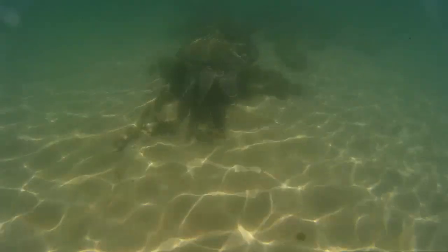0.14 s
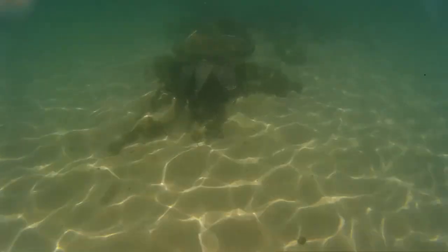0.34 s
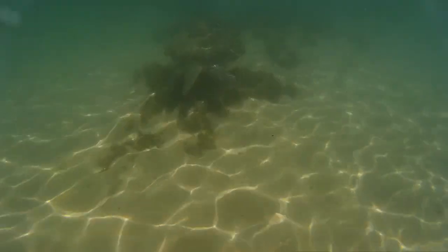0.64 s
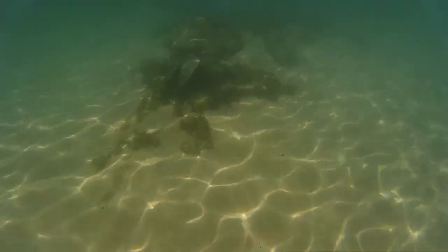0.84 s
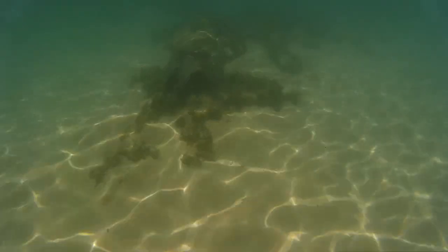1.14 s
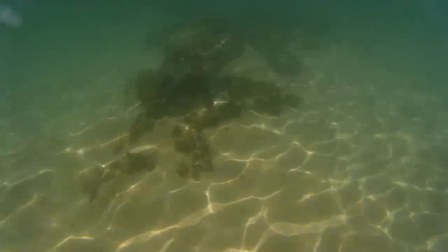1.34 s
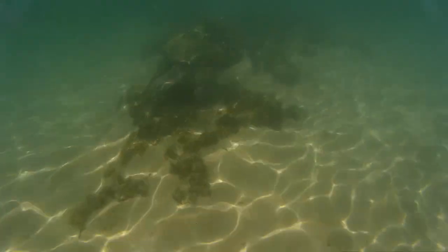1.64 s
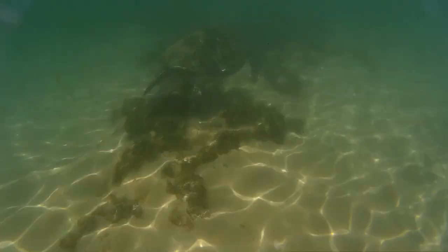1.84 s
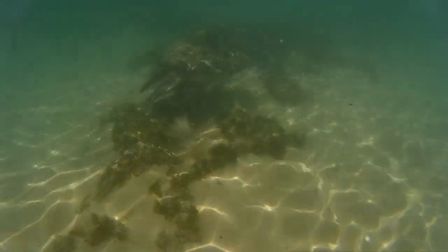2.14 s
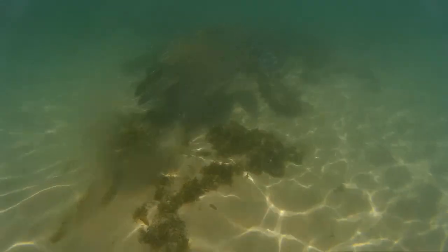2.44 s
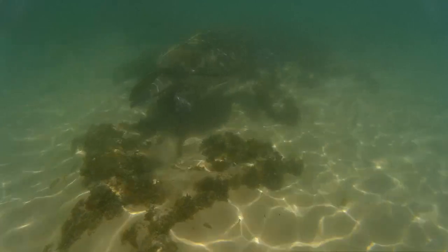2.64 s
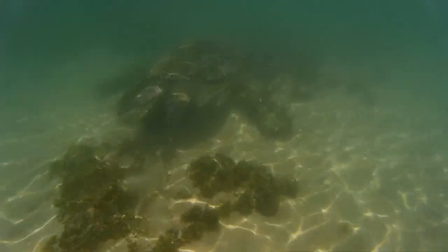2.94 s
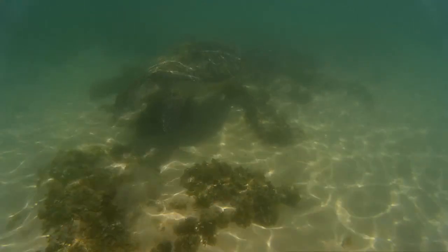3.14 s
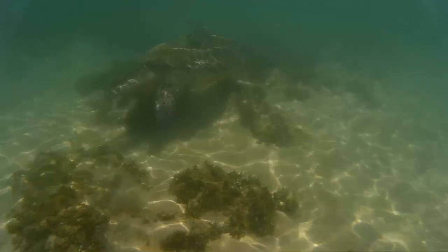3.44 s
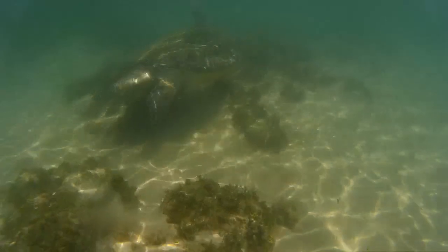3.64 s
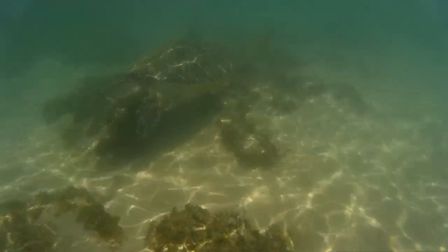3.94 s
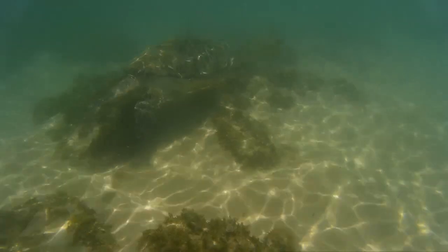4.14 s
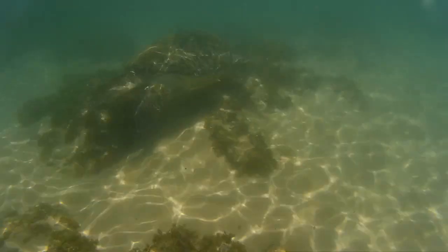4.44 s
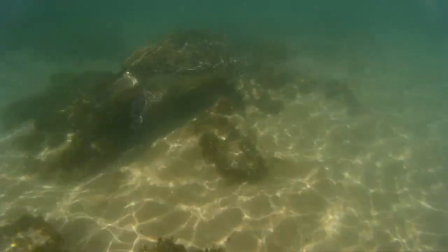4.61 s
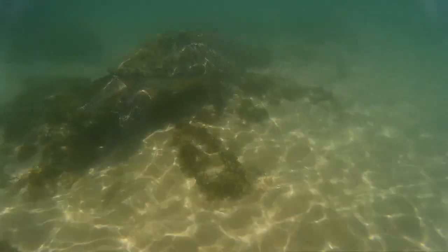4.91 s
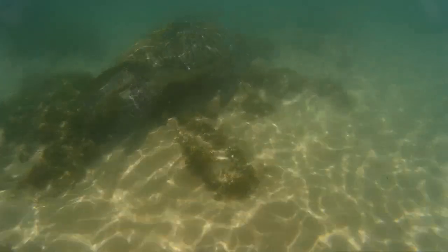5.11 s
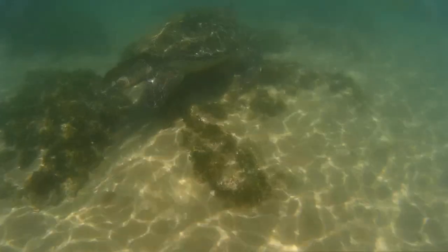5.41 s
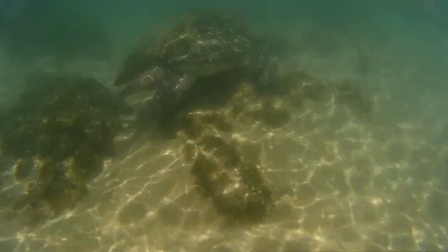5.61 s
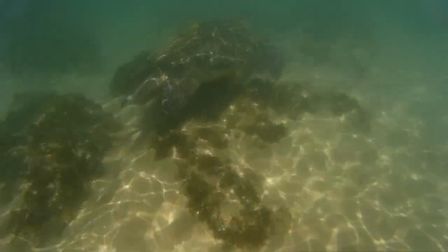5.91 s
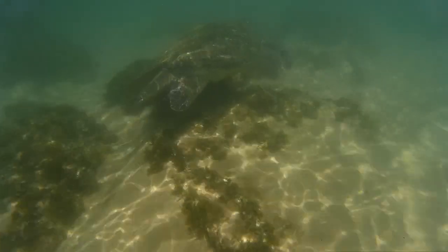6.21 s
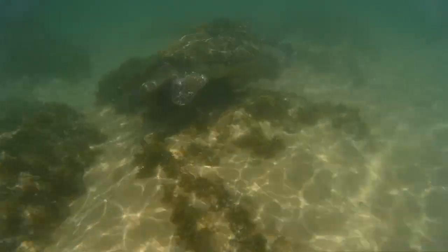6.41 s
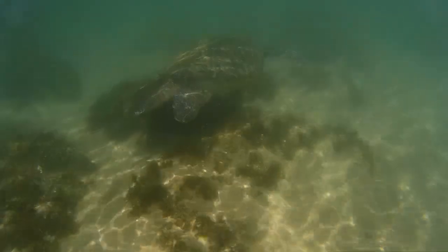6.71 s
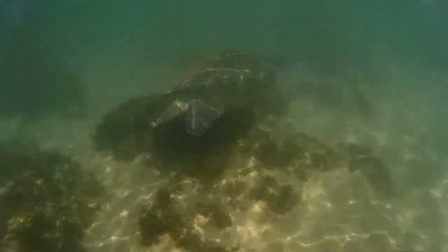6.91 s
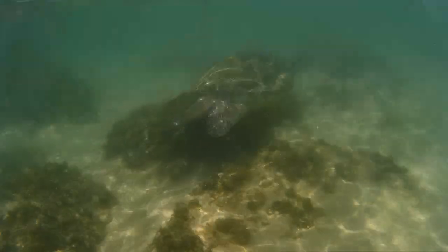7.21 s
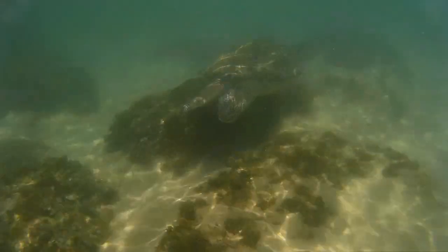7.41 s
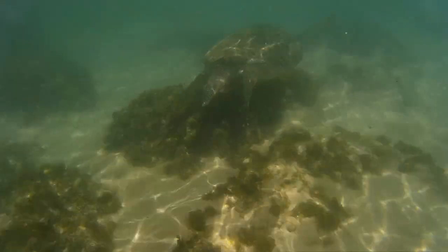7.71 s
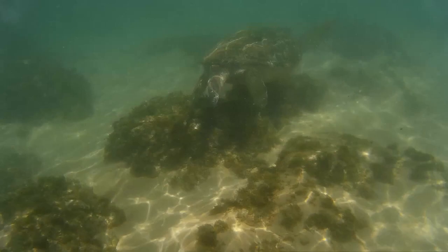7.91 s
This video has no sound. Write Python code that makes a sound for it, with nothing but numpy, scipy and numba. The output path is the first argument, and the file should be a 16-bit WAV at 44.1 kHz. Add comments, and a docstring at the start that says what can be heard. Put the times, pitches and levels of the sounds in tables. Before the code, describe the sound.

A soft, muffled wash of water runs for all eight seconds, with a low swell rumble and faint hiss, heard underwater from a small camera in a sealed housing over a shallow seabed. From about 0.3 to 2.2 seconds, close, sharp clicks, hollow knocks on the housing and short ringing bubble pops come irregularly, far louder than the water; the strongest fall around 0.4, 0.6 and 0.9 seconds, and a few bubbles chirp upward. Then it turns quiet. A faint wavering whine sounds from 2.6 to 3.4 seconds. There is a tiny tick at 4 seconds and a sharper click with a small bump at 4.5. Light ticks come near 6.7 and 7 seconds, with the whine briefly returning between them. The wash swells slightly, and two loud clusters of clicks and pops land at about 7.3 and 7.8 to 8 seconds.

```python
"""Shallow seabed, heard from a small camera gliding over it in a sealed housing.
Water washes past, muffled by the wall and air gap; the swell rumbles on the shell, which ticks and bumps.
Short pings ring out: bubble pops and the struck housing's tones. Fast-rising bubbles chirp upward.
A faint whine comes and goes. The microphone hisses and overloads on the loudest pops."""
import sys
import numpy as np
from scipy import signal
from scipy.fft import rfft, irfft
from scipy.io import wavfile
from scipy.ndimage import uniform_filter1d
from numba import njit

SR = 44100
rng = np.random.default_rng(int(sys.argv[2]) if len(sys.argv) > 2 else 0)


def dump(signal):
    """Clip the signal to [-1, 1] and save it as 16-bit WAV at the path in sys.argv[1]."""
    limited = np.clip(np.atleast_2d(signal).T, -1, 1)
    pcm = np.round(limited * 32767).astype(np.int16)
    wavfile.write(sys.argv[1], SR, pcm)


N = 355446

# water flowing past: time_s, wash_db, gap_hz, rumble_db
FLOW = [(0, -59.5, 858, -64), (.45, -56, 1051, -59), (.9, -58.5, 800, -55), (1.2, -55, 940, -58),
        (1.58, -56, 950, -53), (1.8, -60, 912, -58), (2.15, -53.5, 850, -56), (2.3, -60, 760, -65.5),
        (2.55, -64, 740, -61.5), (2.8, -58.5, 744, -59), (3.4, -58.5, 720, -63.5), (3.6, -67, 703, -68),
        (4.3, -60, 754, -64.5), (4.7, -63.5, 730, -64), (5.1, -63, 909, -66.5), (5.35, -62.5, 801.2, -67),
        (5.8, -62, 768, -63.5), (6.6, -60.5, 750, -62), (7.12, -59, 775, -61), (7.3, -57.5, 985, -64),
        (7.45, -55.5, 1040, -62), (7.75, -57, 890, -59), (8.06, -57.5, 780, -60.5)]
# turbulence bands: centre_hz, width_hz, weight_db
WASH_BANDS = [(281.5, 250, 6.5), (527.1, 350, -1)]
# shell ticks: start_s, level_db, top_re_mid_db, snap_re_top_db
TICKS = [(.328, -52, 0, -13), (0.3631, -15, -5, -13.5), (.4347, -44, -5, -3), (0.5268, -22, -28.5, -12),
         (.547, -39.5, -9.5, -13), (0.5599, -27.5, -0.5, -16), (0.5794, -42, -13.5, -9),
         (0.6029, -14, -9, -10), (.686, -51, -9, -11), (.838, -41, 1, -8.5), (.8952, -29, -7, -8),
         (.901, -9, -16.5, -8.5), (0.9955, -32, -4, -7), (1.0747, -39.5, -8.5, -10),
         (1.106, -53, -11, -5.5), (1.1326, -48.5, -19.5, -7), (1.2893, -47.5, -20.5, -5.5),
         (1.3019, -47.5, -20.5, -6), (1.307, -38, -25, -12), (1.3163, -34, -30.5, -13),
         (1.3261, -26.5, -40.5, -12), (1.5149, -39, -11, -12), (1.5247, -44.5, -2, -12),
         (1.5315, -47.5, -11.5, -10), (1.633, -53, -9, -7), (1.6491, -25, -19, -14),
         (1.6604, -32.5, 2.5, -14), (1.799, -55, -13.5, -13.5), (1.8969, -49.5, -17.5, -14.5),
         (1.9645, -52, -14, -13), (1.978, -51, -13.5, -13), (1.9967, -35, -21, -14),
         (2.0084, -26.5, -26, -24.5), (2.0407, -27.5, 4, -30), (2.0543, -54.5, -10.5, -12),
         (2.0916, -58.5, -20, -9.5), (2.1394, -56, -18.5, -9), (2.196, -30.5, -31.5, -14.5),
         (3.9835, -56, 1, -8), (4.432, -56.5, -11, -6.5), (4.492, -25, -26, -11.5),
         (4.5131, -50.5, 14.5, -11), (5.5895, -49, -5.5, -9.5), (6.6535, -37, -13.5, -16),
         (6.9628, -42, -27.5, -10.5), (7.1652, -55, -6.5, -6), (7.268, -55, -7, -5.5),
         (7.2929, -56, -18.5, -8), (7.3109, -22.5, -12.5, -0.5), (7.3177, -32, -2, -3),
         (7.324, -19.5, -6, -0.5), (7.3303, -24, 1, -17.5), (7.352, -35, -5, -2), (7.8156, -36.5, -10, -6),
         (7.8448, -50.5, -23.5, -11.5), (7.8557, -49, -10.5, -12), (7.865, -17.5, -24, 11),
         (7.8748, -41.5, -24, -14), (7.882, -41, -10.5, -16), (7.9426, -39, 0, -1), (7.9988, -41, -2, 5.5)]
# spells of faint ticks: start_s, end_s, count
FAINT_TICK_SPANS = [(.5, 2.2, 10), (7.55, 7.85, 30)]
# water bumping the shell: peak_s, level_db, length_ms
BUMPS = [(0.361, -56.5, 6.7), (0.601, -32, 12.8), (0.893, -37.5, 2.9), (0.989, -32.5, 11),
         (1.072, -43, 5.96), (1.19, -36.5, 6), (1.514, -38.5, 6.3), (1.633, -31, 12.3), (1.989, -27, 5.4),
         (2.195, -56.5, 6.8), (4.489, -34, 4.27), (5.559, -49.5, 5.9), (7.319, -35, 6), (7.862, -48.5, 6)]
# short ringing pings, bubble pops and the struck housing's tones: start_s, pitch_hz, level_db, t60_ms
PINGS = [(0.365, 1874, 7.5, 8), (0.3636, 2758, -9, 16.5), (0.3668, 1594, -27, 4), (0.367, 1030, -33, 46),
         (.5278, 3367, -8, 11), (.528, 443, -29, 47.5), (0.527, 1220, -16.5, 5), (.549, 1900, -42, 23),
         (.5598, 2270, -36.5, 17.5), (.603, 1367, 9.5, 6), (0.6031, 3896, -8, 8), (0.604, 963, -5, 23),
         (.612, 648, -26, 39.5), (0.84, 391, -29, 24.5), (0.8956, 1027, 0.5, 13),
         (.9008, 473.5, -0.5, 25.5), (.9014, 2078, 1.5, 15.5), (0.9036, 1681, 2.5, 12.5),
         (0.9956, 497.6, -0.5, 49), (1.014, 1407, -31.5, 53), (1.017, 2720, -41, 11),
         (1.084, 2053, -41, 34), (1.083, 690, -18, 42.5), (1.1051, 1212, -16.5, 38),
         (1.106, 1910, -27.5, 46.5), (1.1071, 916.4, -2.5, 23), (1.112, 923.3, -18, 101.5),
         (1.118, 1310, -31.5, 30), (1.1332, 1373, -16, 12.5), (1.203, 480, -35.5, 25),
         (1.134, 4520, -41, 13), (1.2901, 1460, -13, 9.5), (1.3, 2163, -22.5, 17),
         (1.3077, 624.7, -18.5, 36.5), (1.3061, 1408, -10, 22), (1.3097, 2220, -13.5, 9),
         (1.3188, 1586, -9.5, 14), (1.325, 1739, -23.5, 24.5), (1.3258, 3144, -23.5, 18.5),
         (1.5165, 276, -32, 29.5), (1.5637, 1788, -30, 54.5), (1.62, 500, -32, 25), (1.6337, 210, -2, 6),
         (1.636, 940, -23.5, 30), (1.65, 3290, -14, 11.5), (1.6498, 4249, -2.5, 9),
         (1.57, 2530, -44.5, 25.5), (1.625, 1753, -37.5, 27.5), (1.799, 3247, -41.5, 23),
         (1.978, 350, -24.5, 14.5), (1.99, 1556, -25, 24), (1.996, 1249, -23.5, 42.5),
         (2.0083, 3268, -9, 19.5), (2.0412, 662, -21, 44.5), (2.0555, 697.8, -18.5, 42.5),
         (2.091, 452, -20, 7), (2.133, 673, -24, 37.5), (2.091, 2390, -39.5, 15), (2.141, 1062, -22, 40),
         (2.165, 1710, -38.5, 38.5), (2.16, 2847, -29, 18), (2.163, 1144, -29, 43), (2.197, 335, -6, 6),
         (2.1968, 737, -25, 54), (2.197, 2380, -30, 45), (2.242, 3650, -48, 21.5), (3.985, 690, -37.5, 22),
         (3.987, 1501, -47, 13), (3.985, 1943, -45, 11), (4.492, 270, -18.5, 15), (4.497, 110, -36, 75),
         (4.4917, 4020, -4, 4), (4.491, 1346, -17.5, 5.5), (4.4914, 2500, -25, 12),
         (4.4925, 3347, -13.5, 15.5), (5.59, 2164, -51, 26), (6.654, 5017, -12.5, 8),
         (6.746, 1800, -51.5, 17), (6.9635, 638, -34, 78), (6.9652, 2000, -17.5, 13.5),
         (7.293, 1900, -41.5, 25.5), (7.3097, 3360, -15, 12.5), (7.31, 1844, -0.5, 10.5),
         (7.3106, 4150, -15.5, 6.5), (7.325, 1474, -2, 5.5), (7.325, 1076, -13.5, 45.5),
         (7.331, 7180, -16.5, 11), (7.333, 3052, -27, 25.5), (7.335, 4317, -18, 13),
         (7.3531, 1443, -14.5, 4), (7.8172, 1960, -16, 16), (7.8323, 521, -9.5, 37.5),
         (7.832, 792.4, -12, 33), (7.8445, 469.5, -10, 24.5), (7.8646, 309, -9.5, 21),
         (7.865, 643.5, -18, 73), (7.866, 2187, 2, 6), (7.8653, 3311, -12.5, 11.5),
         (7.8667, 1621, 4.5, 9.5), (7.8759, 2446, -21, 18.5), (7.877, 3354, -24.5, 13.5),
         (7.882, 4000, -28.5, 10.5)]
# fast-rising bubbles: start_s, pitch_hz, level_db, t60_ms, climb_per_s (share of pitch)
FAST_BUBBLES = [(.5764, 325, -26, 55, 9.2), (.873, 376, -31, 39, 9.5), (1.075, 889.3, -1, 21, 7.5),
                (1.2894, 627.3, -10.5, 28, 11), (1.651, 1252, -24, 56, 11.55),
                (2.0035, 575, -4.5, 43.5, 3.1), (2.017, 800, -13.5, 44, 4.66),
                (2.1402, 576.3, -11.5, 28.5, 21.3), (2.16, 640, -19, 63.5, 6), (2.208, 1045, -39, 47, 30),
                (7.3243, 2962, -16, 16.5, 14), (7.8169, 335, -23, 58.5, 7)]
# low shell modes: pitch_hz, level_db, t60_ms
SHELL_MODES = [(334, 1.5, 94.5), (629, -4.5, 69.5)]
# blows that ring the low modes: start_s, level_db
KNOCKS = [(0.601, -32), (0.902, -22), (0.996, -26), (1.31, -24.5), (6.964, -43), (7.867, -26.5)]
# spells of whine: start_s, length_s, fundamental_db, octave_db, hum_db
WHINE_SPELLS = [(2.594, 0.854, -62, -80.5, -66), (6.683, 0.36, -72, -70.5, -67.5)]
# microphone hiss spectrum: frequency_hz, relative_density_db
HISS_SPECTRUM = [(530, -31.5), (900, -5.5), (1630, -6.5), (2060, -7), (2350, -8.5), (14400, -10.5),
                 (15900, -18), (16500, -36)]


def undb(db):
    """dB to gain."""
    return 10 ** (np.asarray(db) / 20)


def unit(x):
    """Scale to rms 1."""
    return x / np.sqrt(np.mean(x ** 2))


def curves(table):
    """Table columns, interpolated per sample."""
    time_s, *columns = np.transpose(table)
    return [np.interp(np.arange(N) / SR, time_s, column) for column in columns]


def add(out, start_s, sound):
    """Mix in a short sound."""
    i = int(start_s * SR)
    out[i:i + len(sound)] += sound[:N - i]


@njit
def svf(x, hz, damp):
    """Swept state-variable filter; rows: low-pass, band-pass."""
    y = np.empty((2, len(x)))
    band_state, low_state = 0., 0.
    for i in range(len(x)):
        g = np.tan(np.pi * hz[i] / SR)
        v = (band_state + g * (x[i] - low_state)) / (1 + g * (g + damp))
        y[0, i], y[1, i] = low_state + g * v, damp * v
        band_state, low_state = 2 * v - band_state, low_state + 2 * g * v
    return y


def band(x, hz, width_hz):
    """Static band-pass."""
    return svf(x, np.full(len(x), 1. * hz), width_hz / hz)[1]


def noise_band(hz, width_hz):
    """Band-passed noise, rms 1."""
    return unit(band(rng.standard_normal(N), hz, width_hz))


def walk(rate_hz):
    """Random steps, smoothed twice."""
    hold = int(SR / rate_hz)
    steps = np.repeat(rng.standard_normal(N // hold + 1), hold)
    return uniform_filter1d(uniform_filter1d(steps, hold), hold)[:N]


def wash(flicker_db=2.0, ref_hz=850, ring_db_per_hz=0.0505, upper_db_per_hz=0.14):
    """Turbulence through the air gap: resonance, steep cut above it, weaker second mode."""
    wash_db, gap_hz, _ = curves(FLOW)
    body = sum(undb(db + flicker_db * walk(16)) * band(rng.standard_normal(N), hz, width_hz)
               for hz, width_hz, db in WASH_BANDS)
    for _ in range(4):
        body = svf(body, 1.03 * gap_hz, damp=0.939)[0]
    ring, upper = rng.standard_normal((2, N))
    for _ in range(3):
        ring = svf(ring, .94 * gap_hz, damp=.16)[1]
        upper = svf(upper, 1.75 * gap_hz, damp=.58)[1]
    # narrower gap: higher pitch, stronger modes
    shift_hz = gap_hz - ref_hz
    ring_db = -8 + ring_db_per_hz * shift_hz + flicker_db * walk(14)
    upper_db = np.minimum(-75.5 + upper_db_per_hz * shift_hz, -65) + flicker_db * walk(12)
    return undb(wash_db) * (unit(body) + undb(ring_db) * unit(ring)) + undb(upper_db) * unit(upper)


def swell_rumble():
    """Swell on the shell: three broad low resonances, each drifting in level."""
    _, _, rumble_db = curves(FLOW)
    deep = undb(-3 + 6.0 * walk(7.7)) * noise_band(hz=14, width_hz=24)
    heave = undb(-8 + 2.3 * walk(10)) * noise_band(hz=58, width_hz=40)
    throb = undb(-6 + 2.2 * walk(7)) * noise_band(hz=105, width_hz=60)
    return undb(rumble_db) * (deep + heave + throb)


def ticks(gain_db=3, attack_s=0.0003, faint_db=-65, spread_db=3.5):
    """Shell ticks: noise cracks in four bands; the higher, the shorter."""
    out = np.zeros(N)
    t = np.arange(int(.025 * SR)) / SR
    attack = 1 - np.exp(-(t / attack_s) ** 2)
    faint = [(start_s + u * (end_s - start_s), faint_db + spread_db * (2 * v - 1), -12.5, -9)
             for start_s, end_s, count in FAINT_TICK_SPANS for u, v in rng.random((count, 2))]
    for start_s, level_db, top_db, snap_db in TICKS + faint:
        crack = 0
        for hz, damp, t60_ms, band_db in ((1050, 2.2, 14, 1),  # low
                                          (3800, 1.1, 9, 0),  # mid
                                          (8300, 0.991, 6, top_db),
                                          (13000, .9, 4, top_db + snap_db)):
            burst = rng.standard_normal(len(t)) * attack * undb(-60000 * t / t60_ms)
            for _ in range(3):
                burst = band(burst, hz, damp * hz)
            crack += undb(band_db) * burst / np.abs(burst).max()
        mid_top_norm = np.sqrt(1 + undb(2 * top_db))
        add(out, start_s, undb(level_db + gain_db) / mid_top_norm * crack)
    return out


def bumps(gain_db=6):
    """Water bumps the shell: one pressure swing, up and back."""
    out = np.zeros(N)
    for peak_s, level_db, length_ms in BUMPS:
        t = np.arange(-3 * length_ms * SR // 1000, 8 * length_ms * SR // 1000) / SR
        u = 1000 * t / length_ms
        swing = np.where(u < 0, np.exp(3 * u), np.exp(-u) * (1 - 1.3 * u))
        add(out, peak_s - 3 * length_ms / 1000, undb(level_db + gain_db) * swing)
    return out


def pings(slow_climb_per_s=0.77, rise_cycles=0.1, rise_s=0.00041, push_cycles=0.16, waver=0.17):
    """Bubble pops and struck-housing tones: a pressure push, then a fading, climbing sine."""
    out = np.zeros(N)
    lead_samples = 400
    slow = [(*row, slow_climb_per_s) for row in PINGS]
    for start_s, hz, level_db, t60_ms, climb_per_s in slow + FAST_BUBBLES:
        t = np.arange(-lead_samples, int(t60_ms * SR / 1000)) / SR
        age_s = np.maximum(t, 0)
        jolts = rng.standard_normal(6000)[:len(t)] * (t > 0)
        wobble_rad = waver * uniform_filter1d(np.cumsum(jolts), size=40) * np.sqrt(hz / SR)
        phase = 2 * np.pi * hz * (age_s + climb_per_s * age_s ** 2 / 2)
        ring = np.sin(phase + wobble_rad) * undb(-60000 * age_s / t60_ms)
        attack = 1 - np.exp(-(age_s / (rise_cycles / hz + rise_s)) ** 2)
        push_gain = 0.37 / (1 + (hz / 1200) ** 2)  # stronger for low pings
        push = push_gain / np.cosh(t * hz / push_cycles)
        add(out, start_s - lead_samples / SR - rise_s, undb(level_db) * (push - ring * attack))
    return out


def shell(hits, scatter_db=-20, scatter_t60_ms=24, scatter_hz=900, width_hz=2200):
    """The wall adds a dull scattered tail to each hit; its low modes ring at the listed knocks."""
    t = np.arange(int(.12 * SR)) / SR
    tail = rng.standard_normal(len(t))
    for _ in range(2):
        tail = band(tail, scatter_hz, width_hz)
    tail *= undb(-60000 * t / scatter_t60_ms) * (1 - np.exp(-t / .002))
    out = hits + undb(scatter_db) * signal.fftconvolve(hits, tail / np.linalg.norm(tail))[:N]
    modes = sum(undb(db - 60000 * t / t60_ms) * np.sin(2 * np.pi * hz * t)
                for hz, db, t60_ms in SHELL_MODES)
    modes *= 1 - np.exp(-t / 0.001)
    for start_s, level_db in KNOCKS:
        add(out, start_s, undb(level_db) * modes)
    return out


def whine(pitch_hz=631, waver=.013, fade_share=0.194):
    """Two wavering, fluttering tones an octave apart over a low hum."""
    out = np.zeros(N)
    t = np.arange(N) / SR
    phase = 2 * np.pi * np.cumsum(pitch_hz * (1 + waver * walk(45))) / SR
    flutter = unit(undb(5 * walk(70)))
    hum = noise_band(hz=98.4, width_hz=26)
    for start_s, length_s, fundamental_db, octave_db, hum_db in WHINE_SPELLS:
        edge_s = np.minimum(t - start_s, start_s + length_s - t)
        fade = np.clip(edge_s / (fade_share * length_s), 0, 1)
        tones = undb(fundamental_db) * np.sin(phase) + undb(octave_db) * np.sin(2 * phase)
        out += fade * (flutter * tones + undb(hum_db) * hum)
    return out


def scene(leak_hz=64.7):
    """Mono sum at the capsule; the gap leaks the slowest part of each push."""
    pushes = shell(pings() + ticks()) + bumps()
    leak = signal.butter(1, leak_hz, "high", fs=SR, output="sos")
    return (signal.sosfilt(leak, pushes) + wash() + swell_rumble() + whine())[None]


def record(dry, hiss_db=-70.5, ceiling=.66, cutoff_hz=16300):
    """Microphone: capsule hiss, soft overload, top cut."""
    hz, density_db = np.transpose(HISS_SPECTRUM)
    bin_hz = np.arange(N // 2 + 1) * SR / N
    shape = undb(np.interp(np.log(bin_hz + 1), np.log(hz), density_db))
    hiss = undb(hiss_db) * unit(irfft(rfft(rng.standard_normal(N)) * shape, N))
    drive = (dry + hiss) / ceiling
    clipped = ceiling * drive / (1 + drive ** 12) ** (1 / 12)
    top_cut = signal.ellip(10, .2, 70, cutoff_hz, fs=SR, output="sos")
    return signal.sosfilt(top_cut, clipped)


dry = scene()
out = record(dry)
dump(out)
```